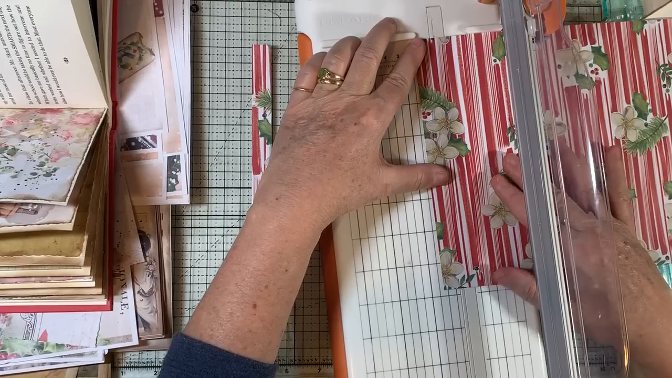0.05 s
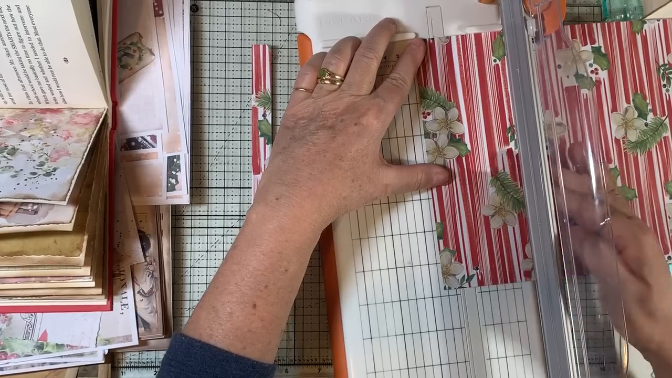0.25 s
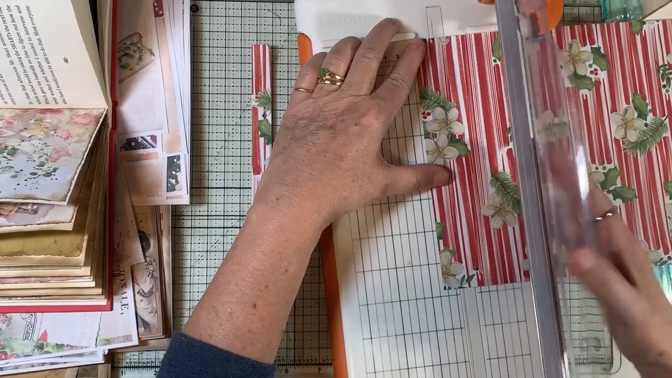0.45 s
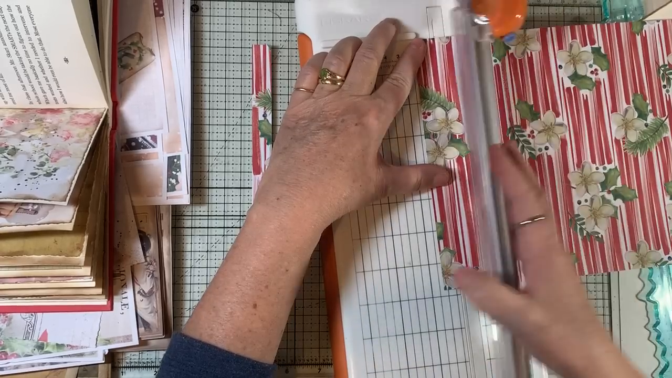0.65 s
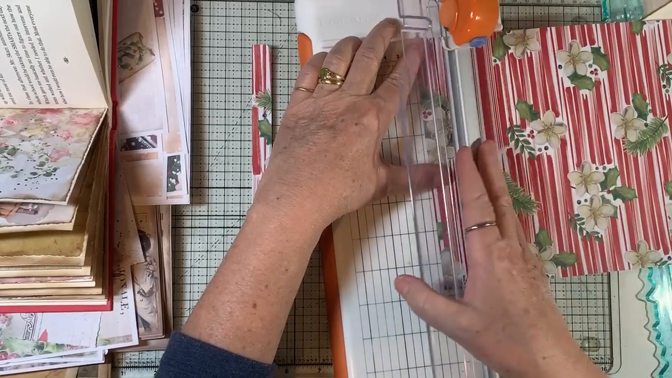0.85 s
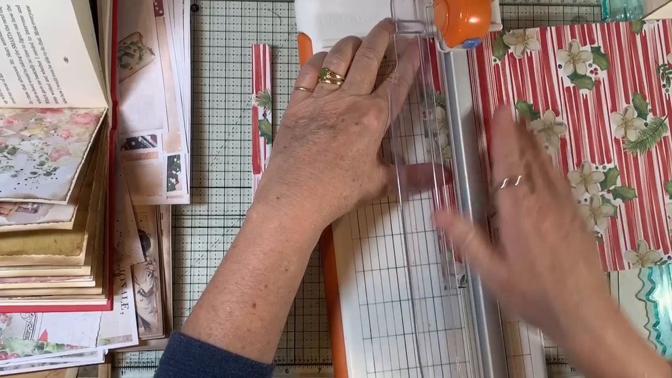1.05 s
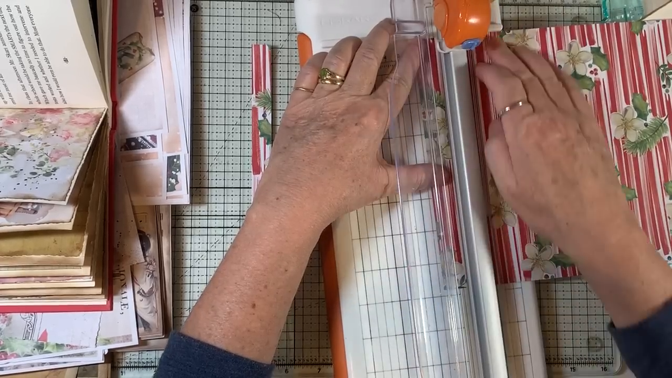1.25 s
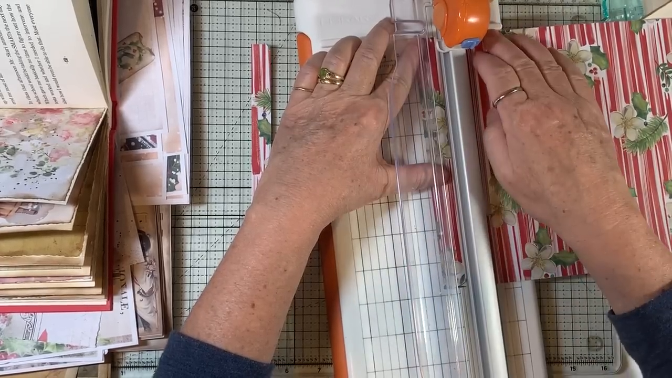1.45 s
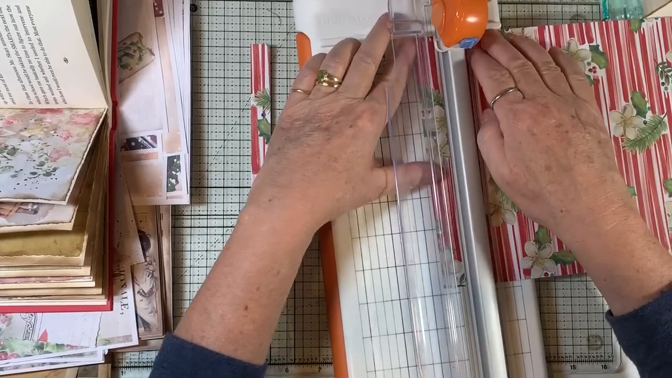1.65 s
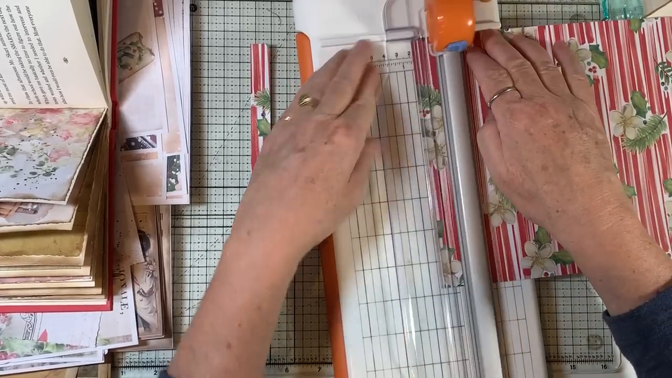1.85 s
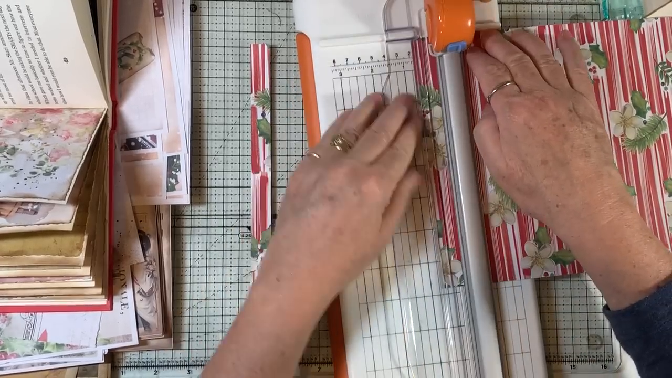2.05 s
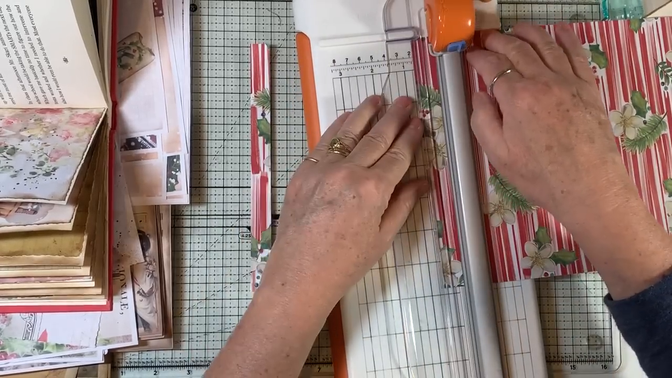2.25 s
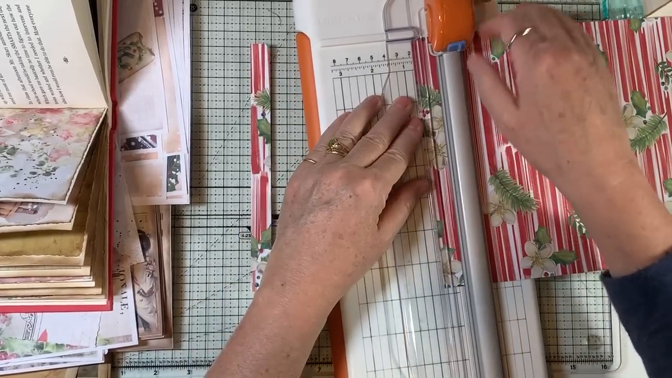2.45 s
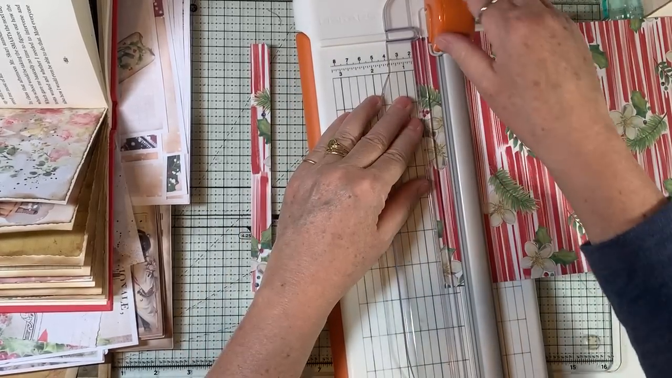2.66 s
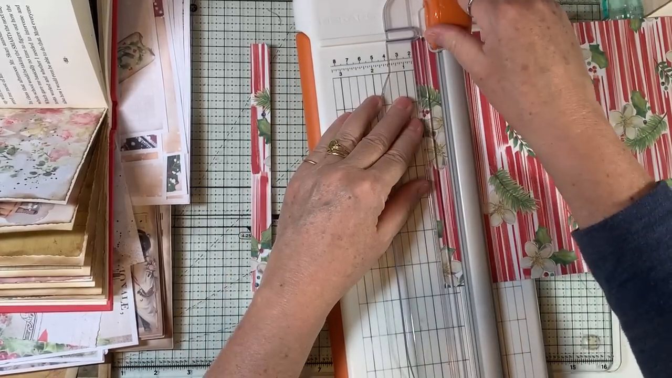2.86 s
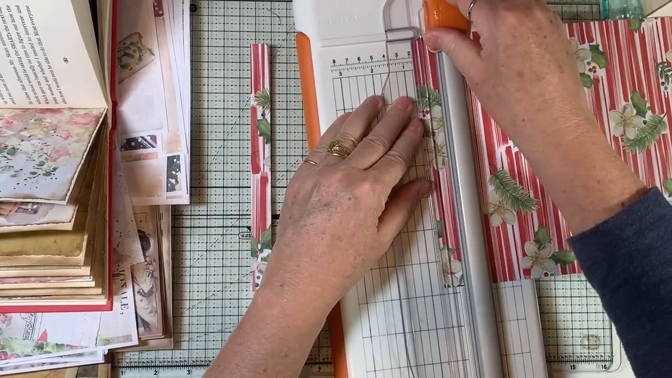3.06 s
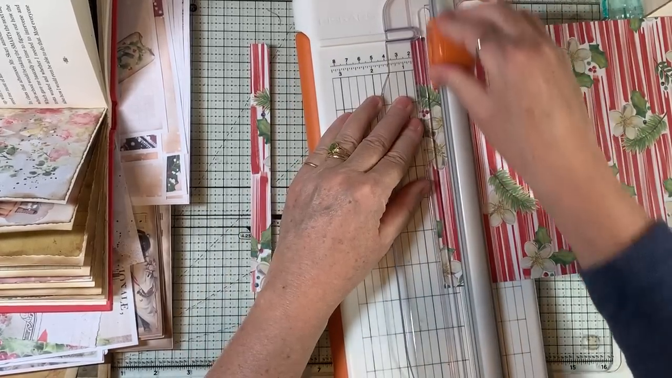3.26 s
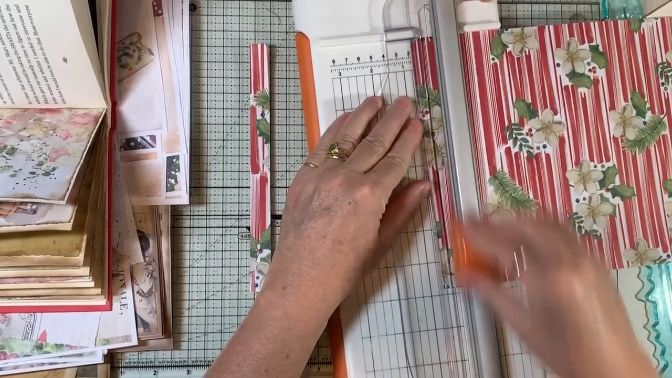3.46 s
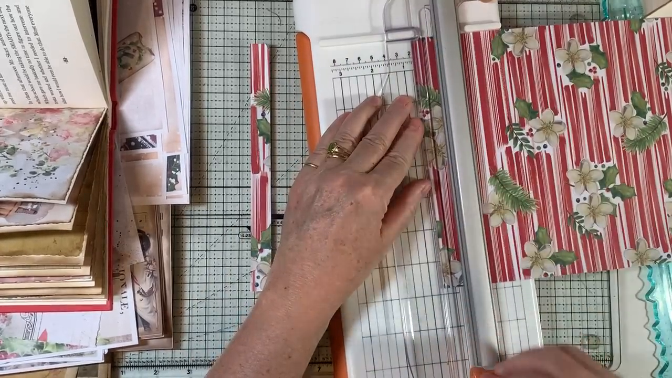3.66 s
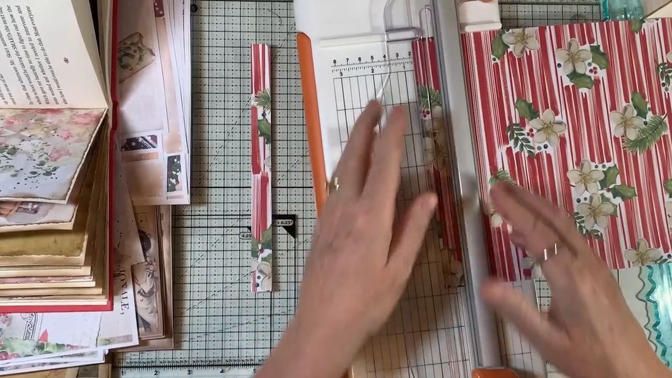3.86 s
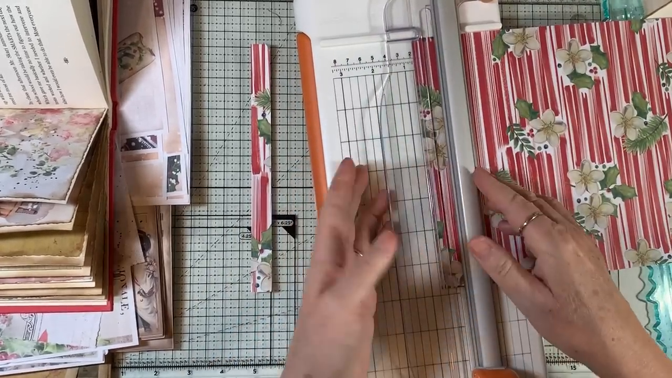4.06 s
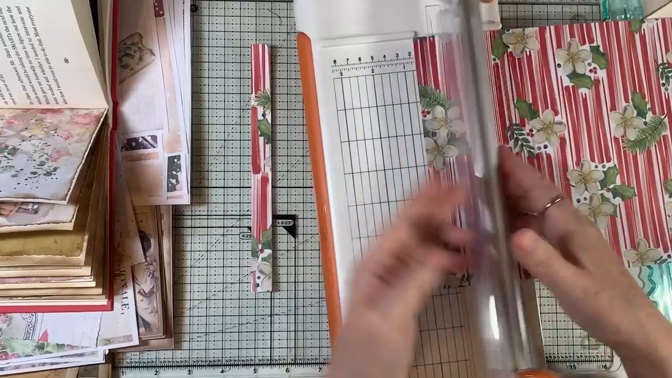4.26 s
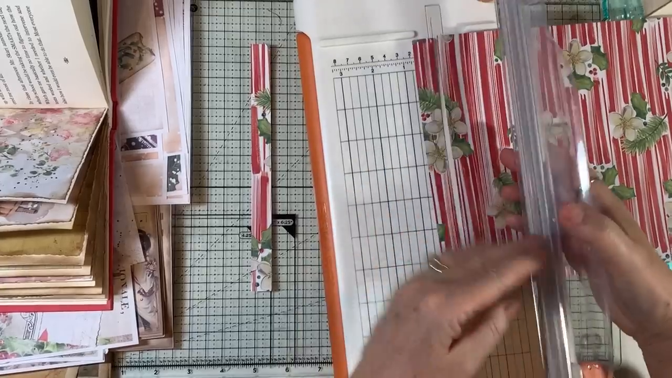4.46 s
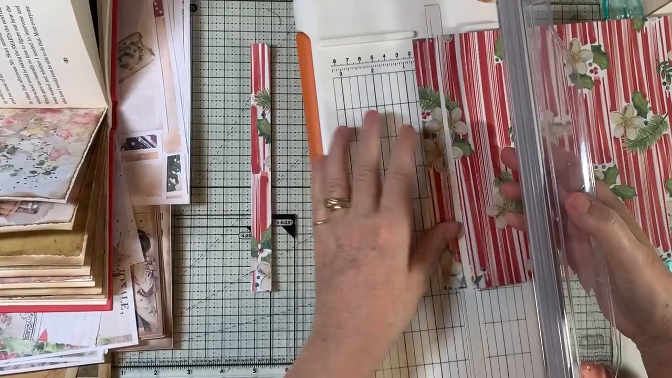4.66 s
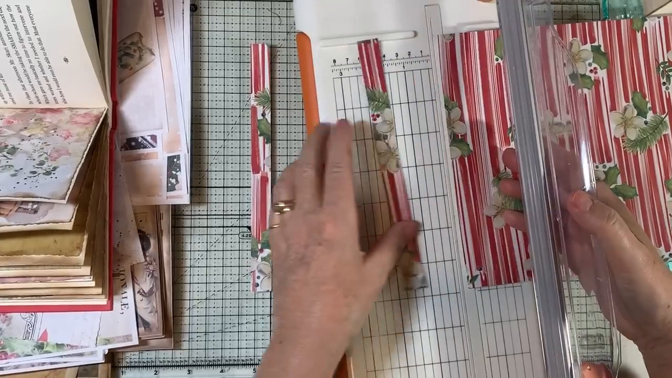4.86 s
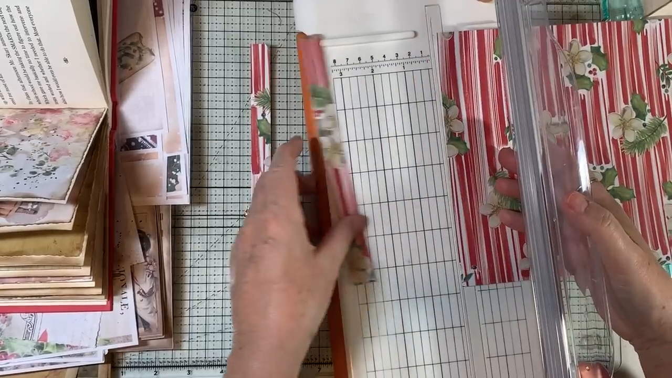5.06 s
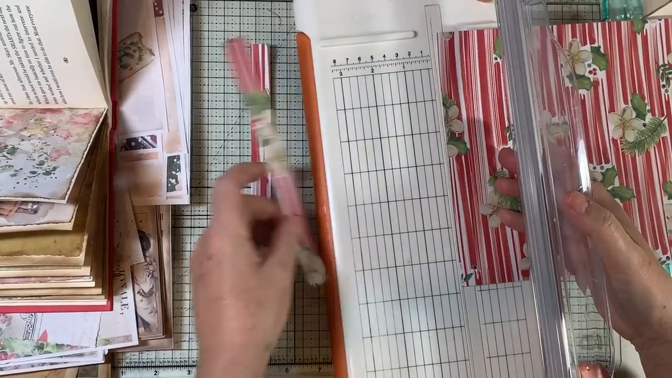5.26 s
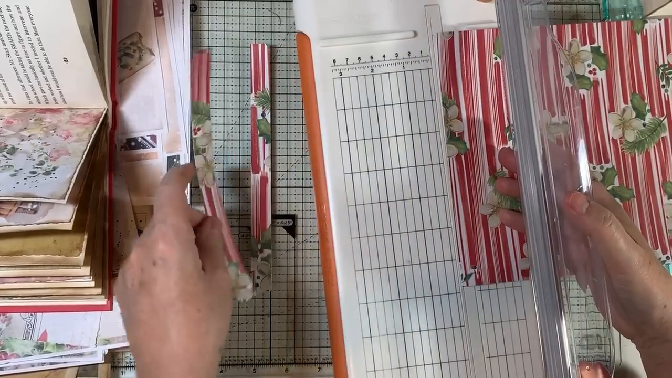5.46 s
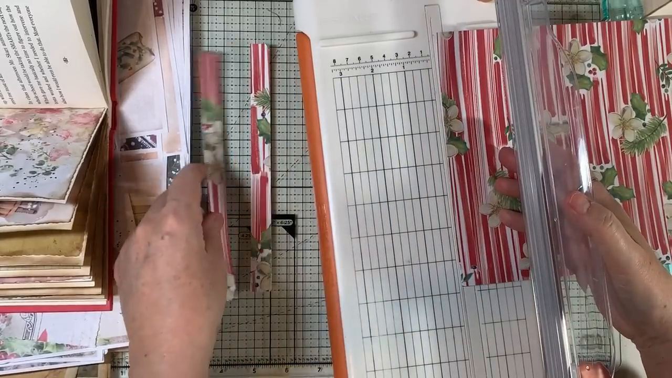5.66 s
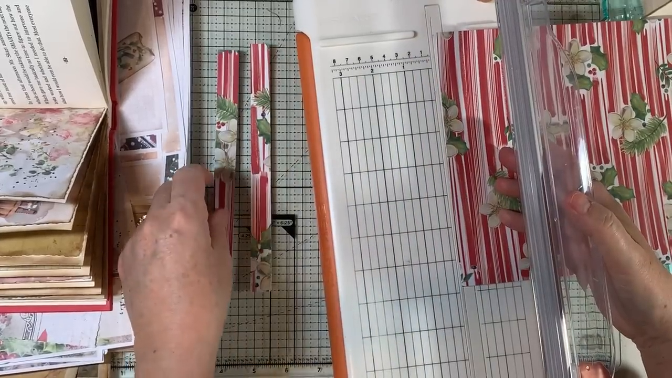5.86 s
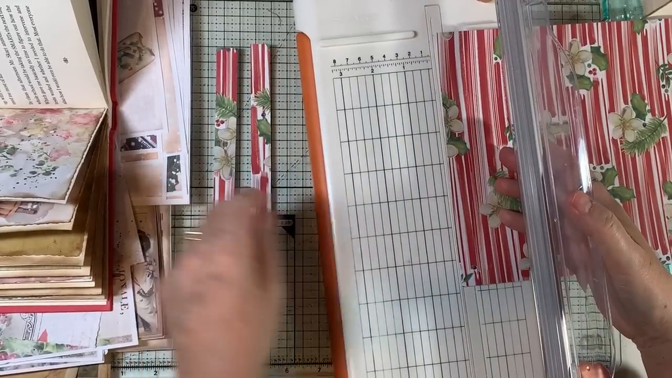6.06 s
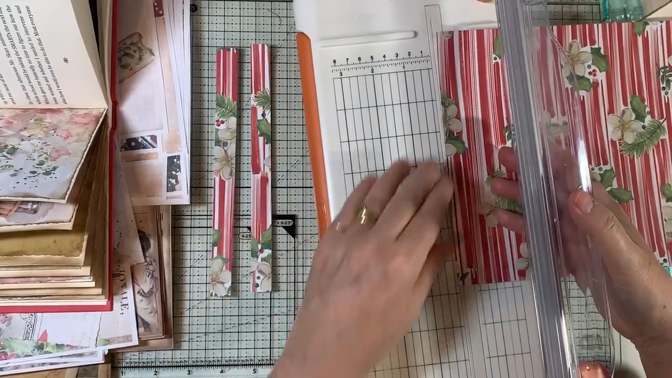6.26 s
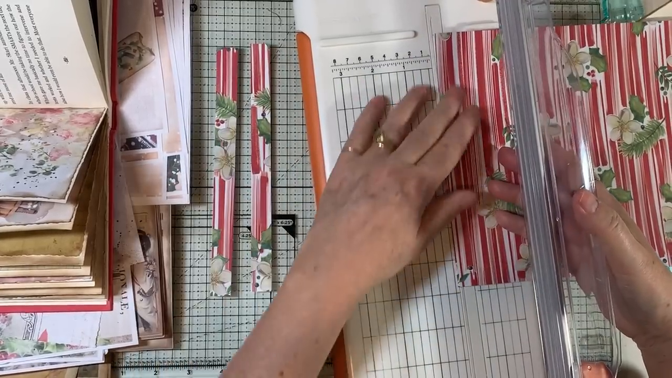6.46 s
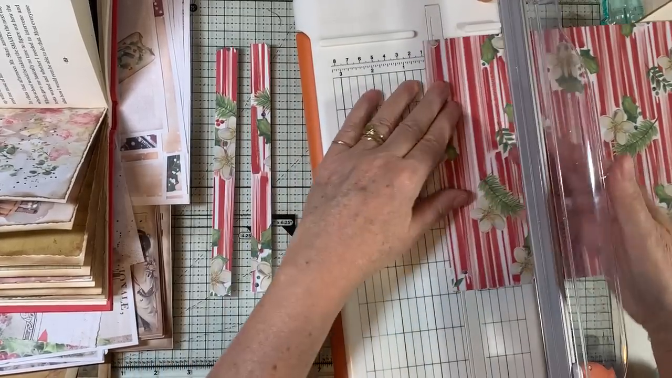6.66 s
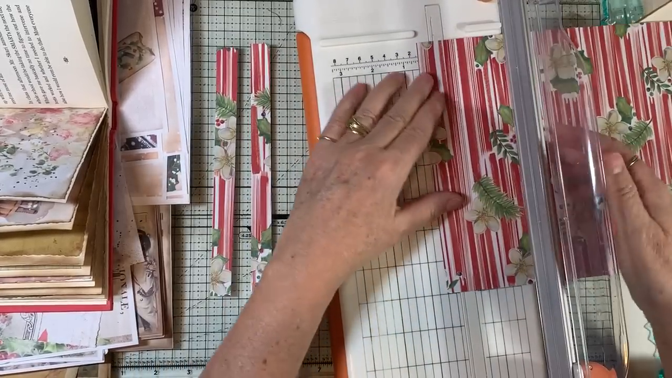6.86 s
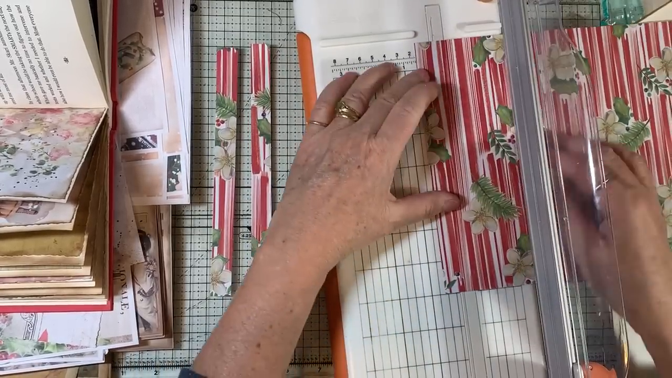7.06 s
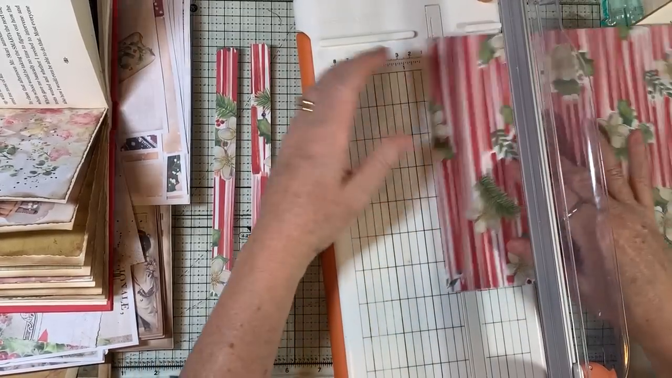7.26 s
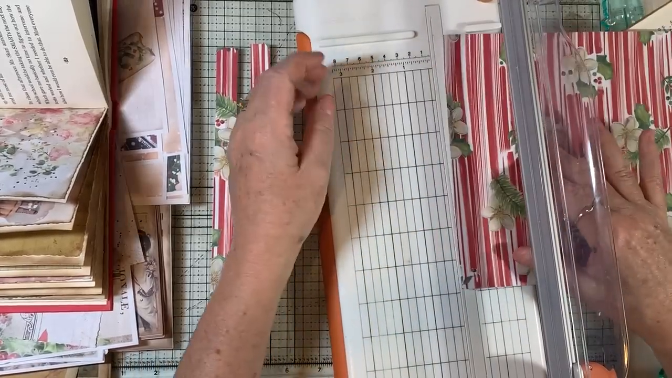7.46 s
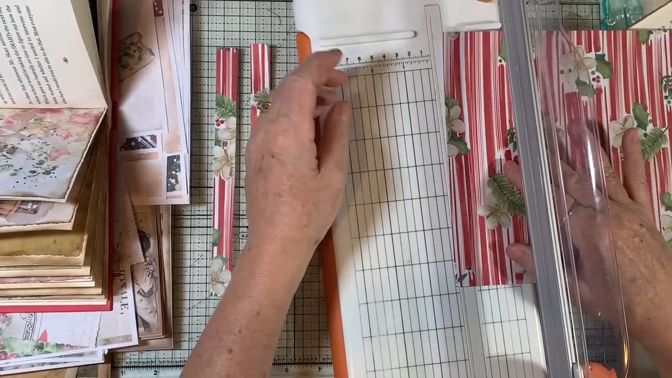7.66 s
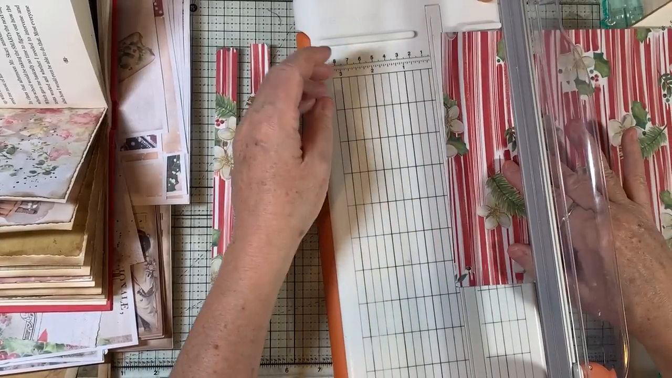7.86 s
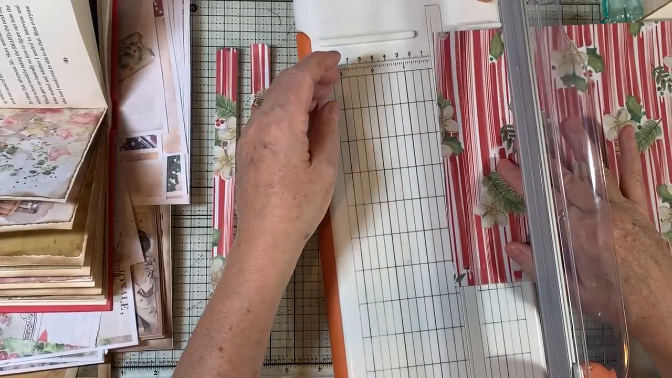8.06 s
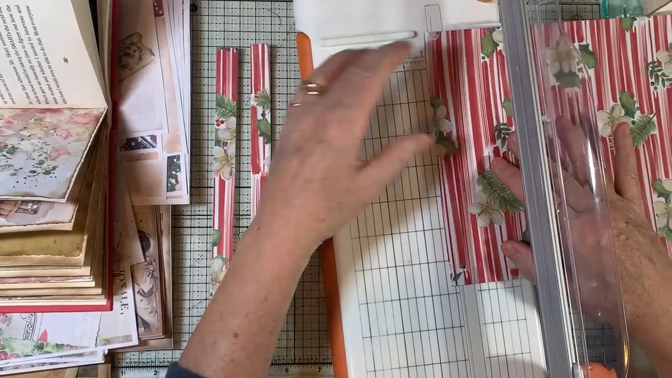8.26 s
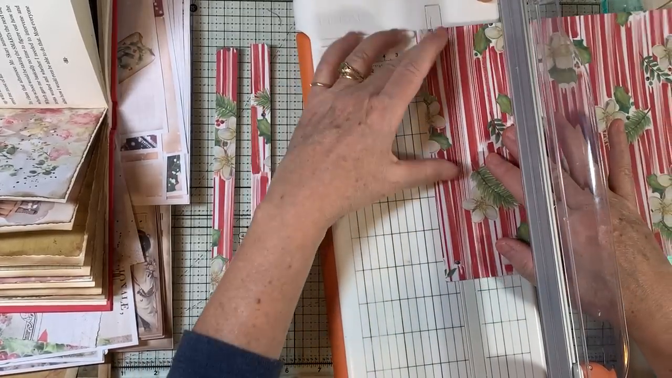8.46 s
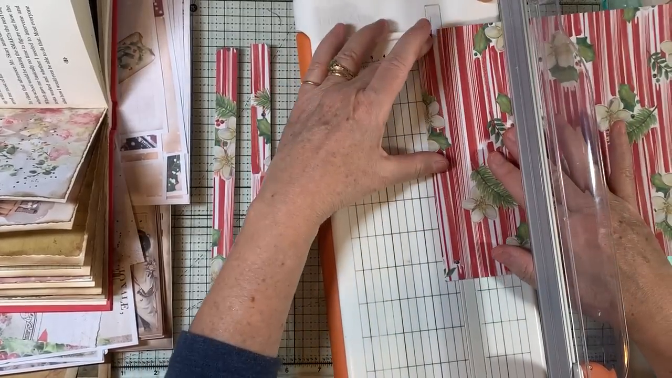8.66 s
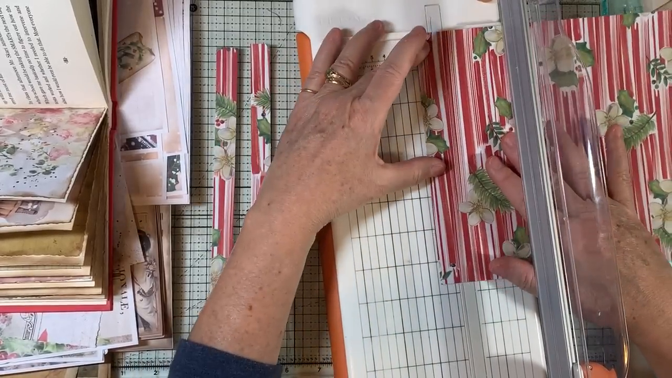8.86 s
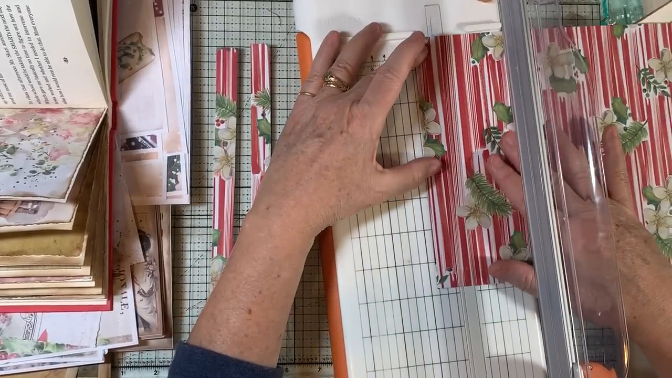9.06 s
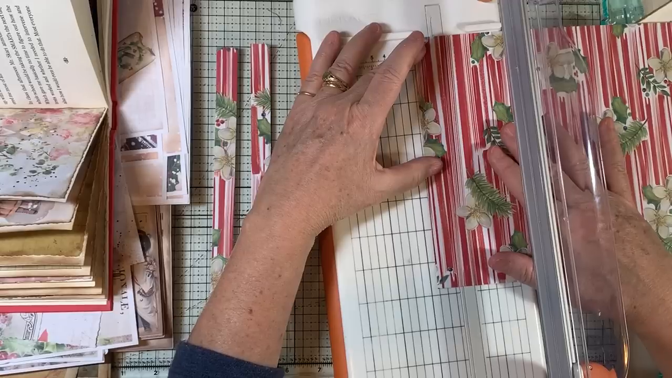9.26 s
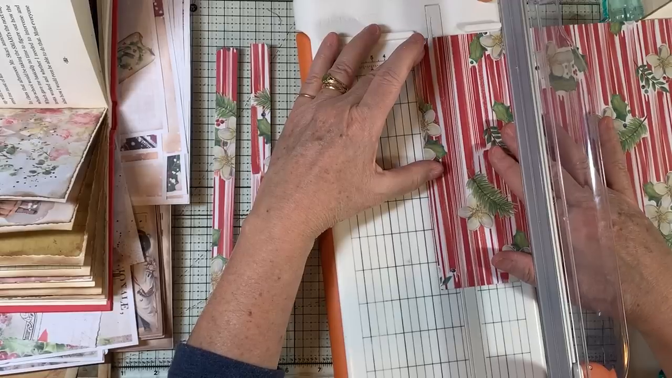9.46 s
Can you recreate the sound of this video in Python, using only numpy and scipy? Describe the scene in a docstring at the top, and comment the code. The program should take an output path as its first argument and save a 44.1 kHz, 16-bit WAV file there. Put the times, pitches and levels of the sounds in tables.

```python
"""A sliding paper trimmer on a craft desk, in a small room filled with a low machinery hum.
Paper slides, the plastic arm drops with a clack and, near 2 s, is pressed shut. The blade carriage
squeaks as it sticks and slips, then rasps down the rail, tearing fibres, and knocks to a stop at 3.6 s.
Just after 5 s the hinge creaks in tiny slips that ring the arm. Sheets slide and tick to the end."""
import sys
import numpy as np
from scipy import signal
from scipy.fft import rfft, irfft, next_fast_len
from scipy.io import wavfile
from scipy.ndimage import uniform_filter1d

SR = 44100
rng = np.random.default_rng(int(sys.argv[2]) if len(sys.argv) > 2 else 0)


def int16_out(signal):
    """Quantize to a 16-bit WAV file."""
    q = np.round(np.clip(np.atleast_2d(signal).T, -1, 1) * 32767)
    wavfile.write(sys.argv[1], SR, q.astype(np.int16))


N = 418950


def gain_of(db):
    """Decibels to gain."""
    return 10 ** (np.asarray(db) / 20)


def unit_rms(x):
    """Scaled to rms 1."""
    return x / np.sqrt(np.mean(x ** 2) + 1e-20)


def curve_at(points, hz):
    """A (freq_hz, value) curve read on a log-frequency axis."""
    f, value = np.transpose(points)
    return np.interp(np.log(hz + 1), np.log(f + 1), value)


def add(mix, start_s, sound):
    """Drops a sound into the mix at start_s."""
    part = mix[..., round(start_s * SR):][..., :sound.shape[-1]]
    part += sound[..., :part.shape[-1]]


def automation(rows):
    """Breakpoints to a start time and one sample-rate lane per value column."""
    times, *values = np.transpose(rows)
    t = np.arange(times[0], times[-1], 1 / SR)
    return times[0], [np.interp(t, times, v) for v in values]


def eq(x, response):
    """x through a frequency response, brought to rms 1."""
    size = next_fast_len(len(x))
    return unit_rms(irfft(rfft(x, size) * response(np.fft.rfftfreq(size, 1 / SR)), size)[:len(x)])


def resonances(modes, hz):
    """Causal response of (pitch_hz, width_hz, level_db) modes."""
    return sum(gain_of(db) / (1 + 2j * (hz - f) / width) for f, width, db in modes)


def drift(shape, bins, frames):
    """Random patches over a spectrogram, smoothed across bins and frames, rms 1."""
    across_bins = uniform_filter1d(rng.standard_normal(shape), size=bins, axis=0)
    return unit_rms(uniform_filter1d(across_bins, size=frames, axis=1))


def grit(count, spread_db, lumps_db, snags_db=0):
    """Fibres catching: noise of uneven grains, bunched in lumps of a few ms, with optional rare snags."""
    snags = signal.lfilter([1], [1, -.994], rng.random(count) < 9 / SR)
    lumps = unit_rms(uniform_filter1d(rng.standard_normal(count), size=300))
    grains = np.minimum(rng.exponential(1, count), 6)
    return rng.standard_normal(count) * gain_of(spread_db * grains + lumps_db * lumps + snags_db * snags)


# How alike diffuse sound is, left and right: freq_hz, correlation
STEREO_LIKENESS = [(60, 0.97), (250, 0.65), (1000, 0.17), (4000, 0.035), (8000, 0.043), (11000, 0.96)]


def diffuse_pair(left, other, hz):
    """Blends two spectra to be as alike as diffuse sound is at the two microphone ports."""
    likeness = np.clip(curve_at(STEREO_LIKENESS, hz), -1, 1)[:, None]
    return np.array([left, likeness * left + np.sqrt(1 - likeness ** 2) * other])


# Tone of the machinery bed: freq_hz, relative_db
HUM_EQ = [(22, -47), (38, -28.5), (51, 7), (66, -11.5), (96, -25.5), (122, -14.5), (152, -28.5), (230, -31),
          (265, -33.5), (380, -28), (490, -35.5), (700, -45.5), (1900, -51.5), (2280, -51), (2700, -54.5),
          (5000, -67), (16000, -69)]


def machinery_hum(level_db=-42, drift_db=0.94):
    """A bed of noise peaking near 51 Hz, its colour gently shifting."""
    hz = np.fft.rfftfreq(4096, 1 / SR)
    shape = (2, len(hz), N // 1024 + 6)
    noise = rng.standard_normal(shape) + 1j * rng.standard_normal(shape)
    colour = gain_of(curve_at(HUM_EQ, hz)[:, None] + drift_db * drift(shape[1:], bins=40, frames=4))
    bed = signal.istft(diffuse_pair(*noise, hz) * colour, nperseg=4096, noverlap=3072)[1]
    return gain_of(level_db) * unit_rms(bed[:, :N])


# Airy top of a slide: freq_hz, relative_db
HISS_EQ = [(2000, -23), (3500, -24), (6000, -5.5), (9000, -4), (12000, -3), (16000, -15)]
# Body of the rubbed sheet: pitch_hz, width_hz, relative_db
SHEET_MODES = [(950, 500, -8), (1520, 260, 3), (2050, 300, 1), (3100, 400, 2), (3650, 300, 5)]
# Cues for sliding paper and fingers: start_s, length_s, hiss_db, scrape_db
SLIDE_CUES = [(0.125, 0.16, -59.5, -64.5), (0.353, 0.16, -57, -64.5), (0.432, 0.21, -72, -67.5),
              (0.595, 0.22, -69.5, -59), (0.981, 0.19, -58.5, -51.5), (1.241, 0.21, -60.5, -66),
              (1.6, 0.18, -80, -67.5), (1.675, 0.45, -76, -81.5), (1.871, 0.14, -63, -64),
              (2.473, 0.097, -67, -58.5), (2.853, 0.25, -84.5, -74), (3.711, 0.38, -72, -76.5),
              (3.997, 0.15, -64, -65.5), (4.209, 0.23, -69.5, -71), (4.386, 0.15, -66, -57),
              (4.572, 0.083, -85, -57.5), (4.678, 0.38, -66.5, -72), (4.958, 0.53, -64.5, -69),
              (5.683, 0.21, -65.5, -71), (6.354, 0.17, -77.5, -71), (6.474, 0.12, -68.5, -75),
              (6.541, 0.26, -68.5, -66), (6.653, 0.22, -61, -57.5), (6.843, 0.21, -65, -76.5),
              (7.038, 0.19, -61, -62), (7.185, 0.16, -70, -66.5), (7.296, 0.22, -56.5, -53),
              (7.492, 0.36, -72.5, -68.5), (7.947, 0.16, -67.5, -63), (7.908, 0.464, -88.5, -73.5),
              (8.247, 0.33, -79, -68.5), (8.501, 0.23, -66.5, -69), (8.847, 0.25, -68, -68.5),
              (9.041, 0.25, -75, -77), (9.328, 0.2, -92, -73)]


def paper_slides(grip_s=0.034, release_s=0.095, slacken_db=-3):
    """Paper hisses over plastic and scrapes duller in its body; each slide grips, slackens, lets go."""
    out = np.zeros(N)
    rubs = grit(len(SLIDE_CUES) * SR // 2, spread_db=3.8, lumps_db=0.44, snags_db=3.4)
    sheet = lambda hz: resonances(SHEET_MODES, hz) * hz / (hz + 400) / (1 + (hz / 5600) ** 6)
    for (start_s, length_s, hiss_db, scrape_db), rub in zip(SLIDE_CUES, np.split(rubs, len(SLIDE_CUES))):
        hiss = gain_of(hiss_db) * eq(rub, lambda hz: gain_of(curve_at(HISS_EQ, hz)))
        scrape = gain_of(scrape_db) * eq(rub, sheet)
        t = np.arange(len(rub)) / SR
        pressure = np.clip(np.minimum(t / grip_s, (length_s - t) / release_s), 0, 1) ** 2
        add(out, start_s, (hiss + scrape) * pressure * gain_of(slacken_db * (t / length_s - .5)))
    return out


# Lowest mode of the base: pitch_hz, width_hz, relative_db
THRUM_MODE = [(130, 43, -0.5)]
# Boxy tone of the hollow base: pitch_hz, width_hz, relative_db
BASE_MODES = [(215, 62, 2.5), (393, 80, -3.5), (546.3, 210, 3.5)]
# Clack of the struck base and arm: pitch_hz, width_hz, relative_db
CLACK_MODES = [(570.6, 240, 1), (960.5, 600, -1), (1130, 74, 1), (1827, 79, -1), (2190, 140, 2),
               (3250, 270, -7), (4100, 590, 1.5), (6000, 470, 0)]


def knock(level_db, pitch_hz, snap_db, rattle):
    """A blow and its rattle: dull thud, broad clack, the ring of the spot struck, a quick snap."""
    t = np.arange(len(rattle)) / SR
    # Lighter knocks land softer, swell more slowly and die sooner.
    blow = gain_of(24.5 + 1.25 * (level_db + 23.5))
    attack_scale = 0.8 - 0.026 * (level_db + 16.5)
    t60_s = 0.1085 + 0.000285 * (level_db + 18)

    def layer(response, arrival_s, decay_scale):
        """One band of the hit, scaled to its loudest 4 ms; low bending waves arrive later."""
        contact = blow * np.exp(-((t - arrival_s) * SR / 2) ** 2)
        attack = -np.expm1(-t / (arrival_s * attack_scale))
        decay = gain_of(-60 * t / (t60_s * decay_scale))
        band = eq(contact + 3.2 * rattle * attack * decay, response)
        return band / np.sqrt(uniform_filter1d(band ** 2, size=176).max())

    lowpass = lambda hz, corner_hz: 1 / (1 + 1j * hz / corner_hz)
    highpass = lambda hz, corner_hz: 1 - lowpass(hz, corner_hz)
    near_modes = [(f, width, db - 40 * np.log2(f / pitch_hz) ** 2) for f, width, db in CLACK_MODES]
    spot = [(pitch_hz, 0.091 * pitch_hz, 0)]
    thud_eq = lambda hz: resonances(BASE_MODES + THRUM_MODE, hz) * lowpass(hz, 1200) ** 2
    ring_eq = lambda hz: resonances(near_modes, hz) * resonances(spot, hz) * lowpass(hz, 3 * pitch_hz) ** 2
    clack_band = lambda hz: highpass(hz, 700) * lowpass(hz, 3.05 * pitch_hz) ** 4
    clack_eq = lambda hz: (0.68 + resonances(CLACK_MODES, hz)) * clack_band(hz)
    snap_eq = lambda hz: highpass(hz, 2600) ** 2 * lowpass(hz, 7000)

    thud_db = -2.5 - 2.5 * np.log2(pitch_hz / 1000)  # higher, stiffer spots thud less
    ring_over_clack_db = -15 - 0.79 * snap_db  # the softer the snap, the purer the ring
    ring_share = 1 / (1 + gain_of(-2 * ring_over_clack_db))
    thud = gain_of(thud_db) * layer(thud_eq, arrival_s=0.00381, decay_scale=0.99)
    ring = np.sqrt(ring_share) * layer(ring_eq, arrival_s=0.0012, decay_scale=0.3)
    clack = np.sqrt(1 - ring_share) * layer(clack_eq, arrival_s=0.0018, decay_scale=0.82)
    snap = gain_of(snap_db) * layer(snap_eq, arrival_s=0.00088, decay_scale=0.15)
    return gain_of(level_db) * (thud + ring + clack + snap)


# Hit list: start_s, level_db, pitch_hz, snap_relative_db
KNOCK_CUES = [(0.407, -37.5, 1420, -5), (0.414, -36, 790, -9), (0.514, -35, 3500, -14),
              (0.521, -39, 910, -0.5), (0.681, -26, 4740, 8), (0.684, -33, 590, -10), (0.696, -39, 586, 7),
              (0.711, -38, 2080, -14.5), (1.01, -39.5, 2100, -11), (1.02, -29.5, 1210, -3),
              (1.045, -32, 2170, -6), (1.076, -34.5, 2180, -32), (1.106, -38.5, 2100, -26.5),
              (1.503, -53, 3160, -43.5), (1.685, -48, 536, -23), (1.915, -38, 2350, -5),
              (1.926, -36, 1980, -4), (1.934, -27, 2100, -7), (1.94, -24.5, 2250, 3), (1.942, -21, 930, -3),
              (2.189, -65, 1215, -41), (2.46, -58, 2200, 2.5), (2.493, -46.5, 2030, -28),
              (2.523, -45, 1920, -13), (2.767, -44, 2100, -6.5), (2.998, -58.5, 1970, -19),
              (3.037, -59.5, 578, -20), (3.561, -28, 1770, -12), (3.734, -50, 1610, -16),
              (3.767, -49.5, 1240, -8), (3.787, -48, 1940, -37), (3.81, -43, 2200, -12.5),
              (4.053, -57.5, 570, -21), (4.121, -56.5, 570, -23), (4.153, -53, 560, -17),
              (4.219, -51.5, 1150, -28), (4.305, -47, 1100, -2), (4.4, -49.5, 2800, -9),
              (4.414, -43, 945, -12), (4.43, -43, 1180, -31), (4.434, -48.5, 3800, -25),
              (4.445, -47, 1820, -28), (4.461, -50.5, 555, -28), (4.506, -42.5, 1000, -3),
              (4.541, -39.5, 1095, -15), (4.612, -50.5, 548, -30), (4.656, -58, 550, -26),
              (4.697, -54.5, 3550, -7), (4.718, -46.5, 1160, -0.5), (4.737, -53, 550, -8),
              (4.99, -48.5, 960, 1), (5.311, -54.5, 1100, -4), (5.32, -45, 3370, -14),
              (5.35, -49.5, 2960, -30), (5.676, -54, 773, -13), (5.858, -60.5, 5900, 14),
              (5.92, -55, 1256, -2), (6.376, -57.5, 2880, -28), (6.514, -57, 926, -13),
              (6.588, -51, 980, 1), (6.615, -49, 780, -33), (6.675, -48.5, 1440, -7), (7.254, -54, 940, -4),
              (7.315, -49, 3430, -11.5), (8.404, -55, 1320, -4.5), (8.527, -49, 1410, -1),
              (8.992, -50.5, 6300, -21), (9.076, -57, 1280, -10)]


def knocks():
    """Arm, carriage and paper edges knock and tick, each with its own rattle and a faded tail."""
    out, fade = np.zeros(N), np.hanning(12288)[6144:]
    rattles = grit(len(KNOCK_CUES) * len(fade), spread_db=3.6, lumps_db=0.8).reshape(-1, len(fade))
    for (start_s, level_db, pitch_hz, snap_db), rattle in zip(KNOCK_CUES, rattles):
        add(out, start_s, knock(level_db, pitch_hz, snap_db, rattle) * fade)
    return out


# Timbre of the squeak: harmonic_number, relative_db
SQUEAK_HARMONICS = [(1, 5), (2, -12), (3, -15), (4, -17.5), (5, -7.5), (6, -18), (7, -22), (10, -20)]
# Squeak automation, one slip per cycle: time_s, pitch_hz, level_db
SQUEAK_MOVES = [(2.862, 1200, -72), (2.903, 1235, -57), (2.92, 1240, -62), (2.934, 1278, -56),
                (2.947, 1275, -60), (2.961, 1280, -51), (2.992, 1275, -68)]


def carriage_squeak(waver_depth=0.02, flutter_db=3.1):
    """The carriage slips at a wavering rate and uneven strength: a stack of fuzzy harmonics."""
    start_s, (pitch_hz, level_db) = automation(SQUEAK_MOVES)
    count = len(pitch_hz)
    waver, flutter = (unit_rms(uniform_filter1d(v, size=120)) for v in rng.standard_normal((2, count)))
    cycles = np.cumsum(pitch_hz * (1 + waver_depth * waver)) / SR
    stack = sum(gain_of(db) * np.cos(2 * np.pi * k * cycles) for k, db in SQUEAK_HARMONICS)
    envelope = gain_of(level_db + flutter_db * flutter) * signal.windows.tukey(count, .15)
    out = np.zeros(N)
    add(out, start_s, envelope * unit_rms(stack))
    return out


# Bright tearing of fibres: freq_hz, relative_db
RASP_EQ = [(1500, -34), (3000, -9), (4500, -0.5), (6500, 3), (10000, 3.5), (16000, -3.5)]
# Ring of the rail at mid-stroke: pitch_hz, width_hz, relative_db
RAIL_MODES = [(1300, 390, 12), (1680, 300, 13), (2300, 500, 10.5)]
# The blade bites, holds, then coasts past the paper edge: time_s, rasp_db
STROKE_MOVES = [(3.19, -91), (3.208, -76), (3.274, -49.5), (3.392, -38), (3.554, -36), (3.562, -32.5),
                (3.58, -53), (3.674, -49), (3.715, -78)]


def blade_stroke(mid_stroke_s=3.47, reference_db=-37.5, rail_climb_per_s=0.85):
    """The blade tears fibres; the carriage shakes the rail and the hollow base."""
    start_s, (rasp_db,) = automation(STROKE_MOVES)
    from_mid_s = start_s + np.arange(len(rasp_db)) / SR - mid_stroke_s

    def fader(db, follow, swell_db_per_s):
        """A body layer follows a share of the rasp's dB moves and swells along the rail."""
        return gain_of(db + follow * (rasp_db - reference_db) + swell_db_per_s * from_mid_s)

    tear = grit(len(rasp_db), spread_db=3.2, lumps_db=1.6)
    judder = grit(len(rasp_db), spread_db=3.25, lumps_db=1.7)
    rasp = gain_of(rasp_db) * eq(tear, lambda hz: gain_of(curve_at(RASP_EQ, hz)))
    thrum = fader(-42, 1.02, 71) * eq(judder, lambda hz: resonances(THRUM_MODE, hz) ** 2)
    base = fader(-38.5, 0.94, 22) * eq(judder, lambda hz: resonances(BASE_MODES, hz))
    ring = eq(np.tile(judder, reps=2), lambda hz: resonances(RAIL_MODES, hz))
    playhead = np.cumsum(1 + rail_climb_per_s * from_mid_s)  # the free rail shortens, so its modes climb
    rail = fader(-42.5, 0.57, 3.9) * np.interp(playhead, np.arange(len(ring)), ring)
    out = np.zeros(N)
    add(out, start_s, rasp + thrum + base + rail)
    return out


# Body of the creaking arm: pitch_hz, relative_db
ARM_LOW_MODES = [(530, 7), (600, 10), (868, 2), (975, 3.5), (1105, -3)]
# Edge of the creaking arm: pitch_hz, relative_db
ARM_HIGH_MODES = [(1485, -10.5), (2005, -2), (2525, -1.5), (2965, -8), (3670, -5), (4250, -4.5)]
# Creak automation: time_s, low_modes_db, high_modes_db
CREAK_MOVES = [(5.108, -70, -72), (5.122, -42.5, -42), (5.148, -68, -71), (5.166, -38.5, -58),
               (5.195, -41.5, -58), (5.212, -41, -47.5), (5.236, -47.5, -55), (5.256, -70, -79)]


def hinge_creak(slips_per_s=2600, width_hz=45):
    """Irregular slips of the hinge ring the fixed modes of the arm."""
    start_s, lanes = automation(CREAK_MOVES)
    count = len(lanes[0])
    slips = (rng.random(count) < slips_per_s / SR) * rng.standard_normal(count)
    out = np.zeros(N)
    for level_db, modes in zip(lanes, (ARM_LOW_MODES, ARM_HIGH_MODES)):
        peaks = [(f, width_hz, db) for f, db in modes]
        ring = eq(slips, lambda hz: resonances(peaks, hz) / (1 + (hz / 4800) ** 4))
        add(out, start_s, gain_of(level_db) * ring)
    return out


def shifting_contact(x, depth_db):
    """Contact shifts as it slides: patches of the spectrum swell and sink."""
    spectra = signal.stft(x, nperseg=256)[2]
    patches = gain_of(depth_db * drift(spectra.shape, bins=4, frames=14))
    return signal.istft(spectra * patches, nperseg=256)[1][:N]


def desk_scatter(x, depth):
    """Hands and desk scatter close sound, so its phase drifts apart left and right."""
    hz, _, spectra = signal.stft(x, SR, nperseg=256, noverlap=192)
    unlikeness = np.sqrt(1 - np.clip(curve_at(STEREO_LIKENESS, hz), -1, 1) ** 2)
    treble = hz ** 2 / (hz ** 2 + 2600 ** 2)  # long waves pass round the hands
    apart_rad = depth * (unlikeness * treble)[:, None] * drift(spectra.shape, bins=5, frames=60)
    pair = [spectra * np.exp(.5j * apart_rad), spectra * np.exp(-.5j * apart_rad)]
    return signal.istft(pair, nperseg=256, noverlap=192)[1][:, :N]


# Decay of the room tail, dying quicker in the treble: freq_hz, t60_s
ROOM_DECAY = [(200, .16), (1000, .13), (4000, .11), (12000, .08)]


def room_reverb(x):
    """Sparse reflections of random sign, each band dying at its own speed."""
    taps = np.zeros((2, SR // 2))
    arrivals = np.arange(100, SR // 2 - 20, 20) + rng.integers(0, 20, (2, (SR // 2 - 101) // 20))
    np.put_along_axis(taps, arrivals, rng.choice([-1., 1.], arrivals.shape), 1)
    hz, t, spectra = signal.stft(taps, SR, nperseg=256)
    decay = gain_of(-60 * t / curve_at(ROOM_DECAY, hz)[:, None])
    tail = signal.istft(diffuse_pair(*spectra, hz) * decay, SR, nperseg=256)[1]
    return signal.oaconvolve(x[None], tail / np.linalg.norm(tail[0]), axes=1)[:, :N]


def scene():
    """The hum bed, the close desk sounds spread in stereo, and their room tail."""
    paper = shifting_contact(paper_slides(), depth_db=1.9)
    cut = shifting_contact(blade_stroke(), depth_db=2.2)
    desk = paper + knocks() + carriage_squeak() + cut + hinge_creak()
    return machinery_hum() + desk_scatter(desk, depth=2.45) + gain_of(-8.0) * room_reverb(desk)


# Balance of the microphone ports: freq_hz, left_over_right_db
PORT_BALANCE = [(60, -3.5), (130, 0.5), (290, -3.5), (640, -3), (1410, 2), (3100, 0.5), (6820, -3),
                (15000, 0)]
# Treble phase between the ports: freq_hz, left_lead_rad
PORT_PHASE = [(7900, 0), (8300, -.8), (8950, -4.3), (11750, -9.4), (14950, -15.7), (16000, -16.3)]


def record(dry):
    """Two microphone ports in one housing differ in level and treble phase; lows and top are cut."""
    padded = np.pad(dry, ((0, 0), (4096, 4096)), "reflect")
    size = next_fast_len(padded.shape[1])
    hz, side = np.fft.rfftfreq(size, 1 / SR), np.array([[.5], [-.5]])
    ports = gain_of(side * curve_at(PORT_BALANCE, hz)) * np.exp(1j * side * curve_at(PORT_PHASE, hz))
    low_cut = 1 / (1 + (41 / (hz + 1)) ** 6)
    high_cut = np.clip((15800 - hz) / 150, 0, 1) ** 2
    return irfft(rfft(padded, size) * ports * low_cut * high_cut, size)[:, 4096:4096 + N]


dry = scene()
out = record(dry)
int16_out(out)
```